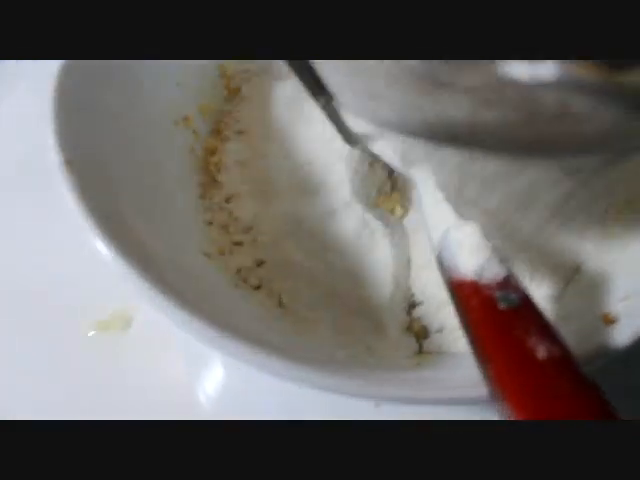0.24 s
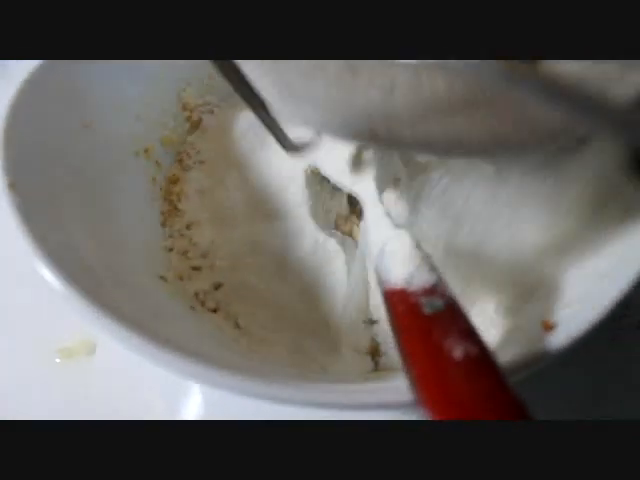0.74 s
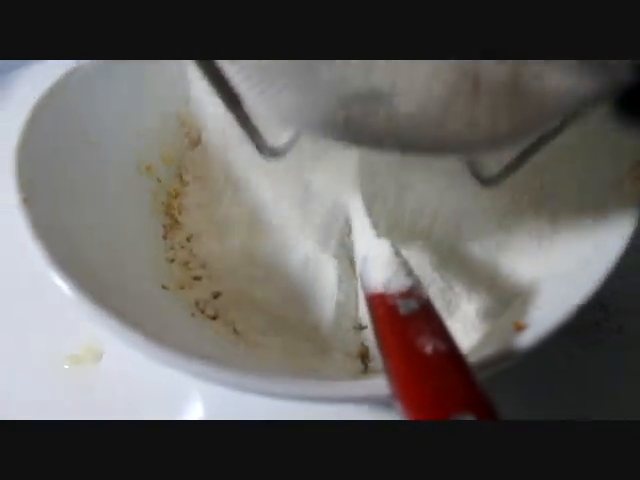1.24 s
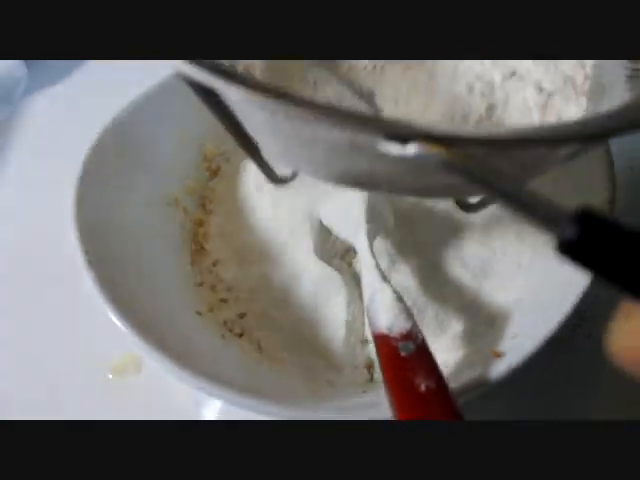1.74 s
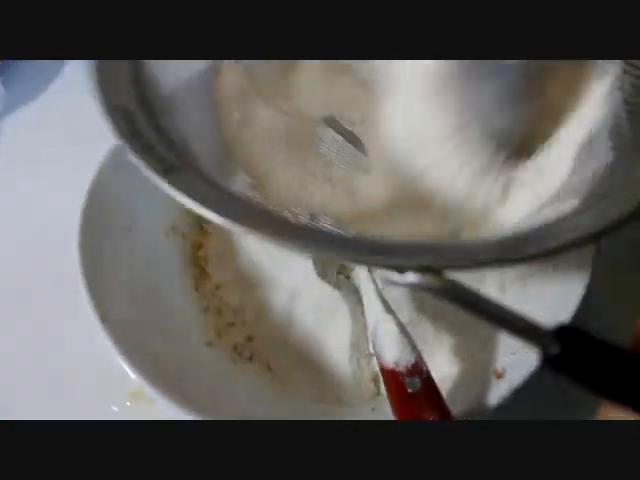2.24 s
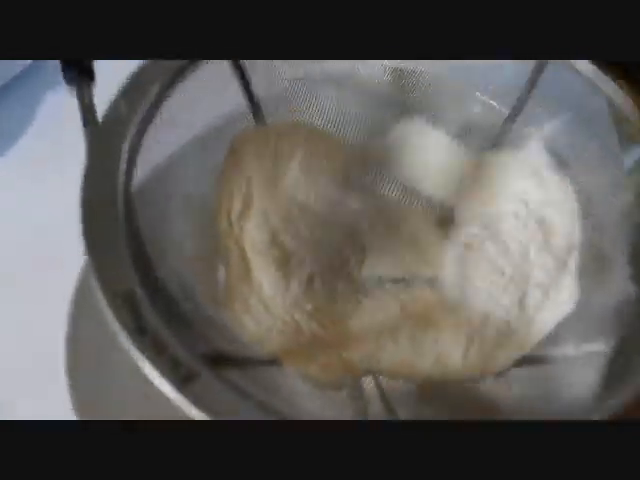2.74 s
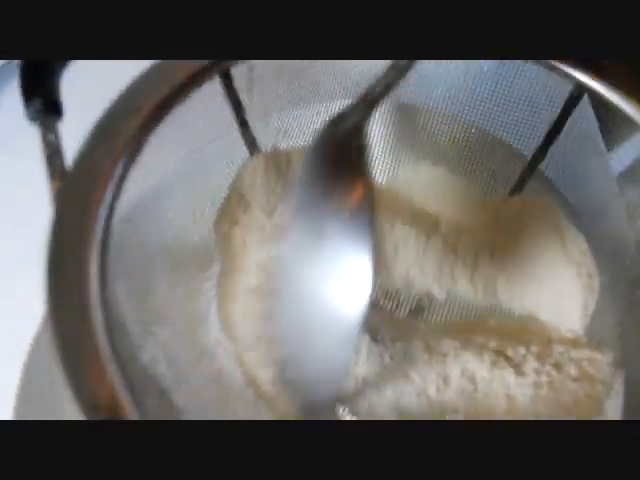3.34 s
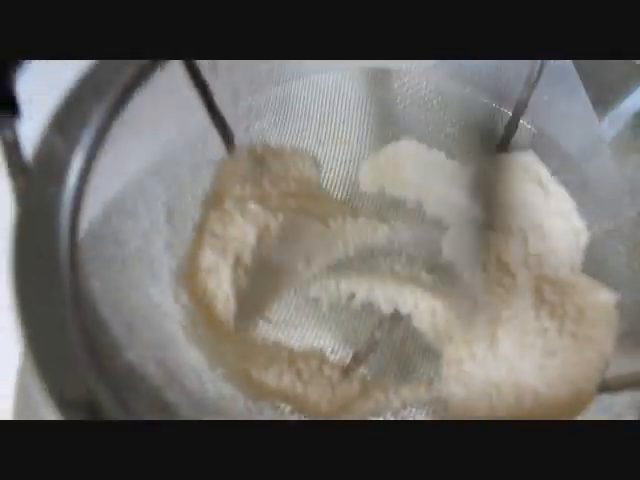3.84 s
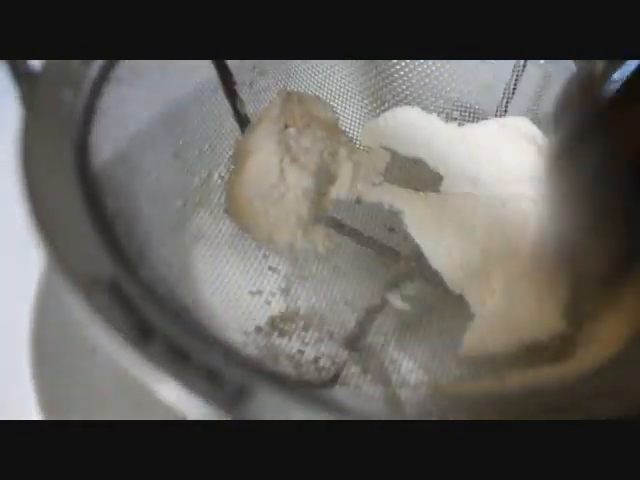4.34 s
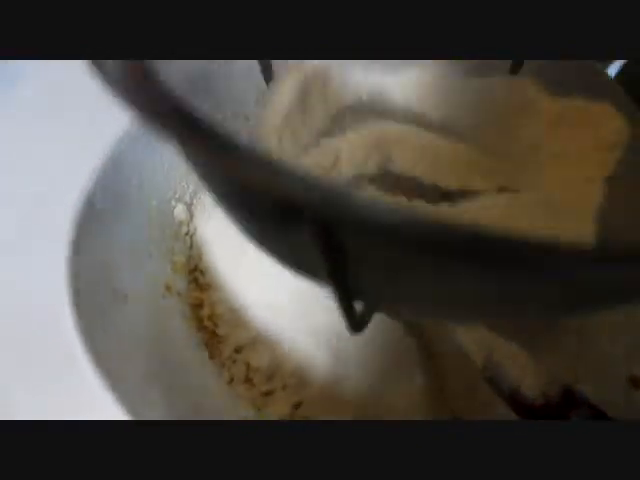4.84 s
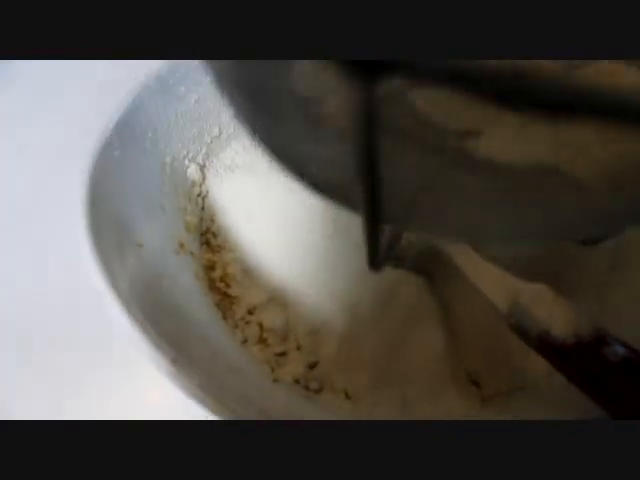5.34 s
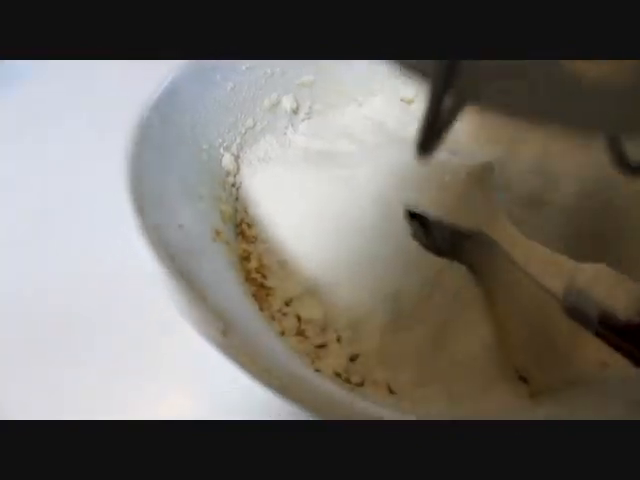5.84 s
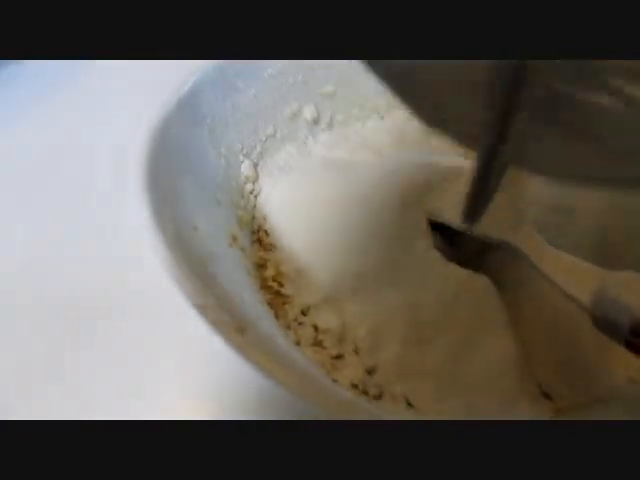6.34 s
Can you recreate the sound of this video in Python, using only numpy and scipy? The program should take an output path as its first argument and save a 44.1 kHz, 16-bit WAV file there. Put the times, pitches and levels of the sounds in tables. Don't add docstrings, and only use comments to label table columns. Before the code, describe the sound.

A fork scrapes flour through a wire sieve very close to a small microphone in a quiet kitchen. Quick raspy strokes come several per second, tines tripping over wires in dense ticks, with light taps, plucks and brief pauses. As the sieve empties, the sound turns from muffled and floury to barer and more ringing. A faint appliance hum and hiss continue underneath.

```python
import sys
import numpy as np
from scipy import signal
from scipy.fft import rfft, irfft
from scipy.io import wavfile
from scipy.ndimage import uniform_filter1d

SR = 44100
rng = np.random.default_rng(int(sys.argv[2]) if len(sys.argv) > 2 else 0)


def generate_wav(sig):
    pcm = np.round(np.clip(np.atleast_2d(sig).T, -1, 1) * 32767).astype(np.int16)
    wavfile.write(sys.argv[1], SR, pcm)


def convert_level_to_amplitude(level_db):
    exponent = np.asarray(level_db, float) / 20
    return 10 ** exponent


N = 291060
HZ = np.fft.rfftfreq(4096, 1 / SR)


def evened(x):
    return x / np.sqrt(np.mean(x ** 2) + 1e-20)


def smooth_noise(first, second):
    return evened(uniform_filter1d(uniform_filter1d(rng.standard_normal(N), size=first), size=second))


def read(points, hz):
    f, value = np.transpose(points)
    return np.interp(np.log(hz + 1), np.log(f + 1), value)


# (frequency [Hz], density [dB per Hz])
ROOM_HISS = [(15, -40), (25, -22), (100, -14), (216, -1), (330, -3.5), (557, -5), (729, -7), (1150, -11),
             (1820, -21), (2150, -12), (2660, -12.5), (3990, -12), (6310, -22), (7830, -14), (12100, -37),
             (14200, -34), (15800, -40)]
# (frequency [Hz], level [dB rms], drift [dB per s])
COMPRESSOR = [(60.6, -74, -0.5), (107, -71, 1), (120, -71, 0), (153, -62.5, 0.2), (192.5, -58, 0),
              (249, -59, 1.54), (422, -71, -2.5)]
HISS_DB = -49


def room_tone():
    hz, t = np.fft.rfftfreq(N, 1 / SR), np.arange(N) / SR
    spectrum = rfft(rng.standard_normal(N)) * convert_level_to_amplitude(read(ROOM_HISS, hz))
    hiss = evened(irfft(spectrum, N))
    lines = 0
    for f, db, drift_db in COMPRESSOR:
        waver = smooth_noise(6000, 4000)
        level = convert_level_to_amplitude(db + 3 + drift_db * (t - t.mean()) + 1.1 * waver)
        phase = 2 * np.pi * (f * t + rng.random()) + 0.3 * waver[::-1]
        lines = lines + level * np.sin(phase)
    return convert_level_to_amplitude(HISS_DB) * hiss + lines


# (peak [s], pressure [dB], rise [s], fall [s], tine ring [dB])
FORK_STROKES = [(0.025, -22.5, 0.031, 0.065, -28.0), (0.134, -29.5, 0.015, 0.021, -28.0),
                (0.174, -36.2, 0.026, 0.094, -23), (0.268, -23.5, 0.055, 0.027, -25),
                (0.348, -21.5, 0.063, 0.013, -23), (0.51, -35.0, 0.018, 0.31, -16),
                (0.595, -20.5, 0.033, 0.021, -27.0), (0.621, -23, 0.0093, 0.24, -35.0),
                (0.784, -44, 0.15, 0.0057, -30.0), (1.024, -30.5, 0.04, 0.012, -8),
                (1.075, -16.5, 0.049, 0.097, -27), (1.154, -33, 0.022, 0.13, -28.0),
                (1.263, -18, 0.043, 0.07, -31.0), (1.299, -25.5, 0.009, 0.078, -24),
                (1.387, -21.5, 0.048, 0.088, -23), (1.512, -17.5, 0.045, 0.074, -22.0),
                (1.651, -21, 0.079, 0.047, -21.0), (1.75, -29.5, 0.036, 0.005, -20.0),
                (1.998, -20, 0.086, 0.14, -23), (2.101, -27, 0.21, 0.023, -13),
                 (2.298, -32, 0.005, 0.075, -17), (2.364, -25, 0.079, 0.038, -21),
                 (2.525, -35, 0.016, 0.12, -14.0), (2.61, -29, 0.06, 0.04, -11),
                 (2.66, -18.5, .015, .03, -14), (2.688, -17, 0.075, 0.072, -14),
                 (2.724, -23.5, 0.075, 0.092, -27), (3.013, -31, 0.0061, .03, -25),
                 (3.04, -17.5, 0.025, 0.068, -30), (3.059, -14.5, .007, .008, -30),
                 (3.108, -24, 0.1, 0.022, -32.0), (3.295, -29.5, 0.004, 0.05, -34.0),
                 (3.372, -17.5, 0.066, 0.044, -20), (3.541, -31, 0.0081, 0.1, -14),
                 (3.646, -15.5, 0.044, 0.035, -29.0), (3.699, -19, 0.029, 0.081, -32.0),
                 (3.823, -20, 0.037, 0.072, -27), (3.964, -18.5, 0.064, 0.05, -20.0),
                 (4.072, -16.5, 0.046, 0.054, -19.0), (4.271, -29.5, 0.011, 0.03, -23),
                 (4.383, -15.9, 0.049, 0.017, -35.0), (4.438, -20, 0.048, 0.084, -35.0),
                (4.636, -22, 0.013, 0.087, -25.0), (4.709, -21, 0.056, 0.047, -22.0),
               (4.899, -26.5, 0.035, 0.083, -13.0), (4.967, -18, 0.062, 0.061, -28),
               (5.113, -17.5, 0.05, 0.053, -21), (5.237, -20.5, 0.074, 0.051, -23),
               (5.363, -18, 0.06, 0.045, -18), (5.471, -18, 0.061, 0.024, -23),
               (5.712, -20.5, 0.03, 0.027, -14.0), (5.785, -18.5, 0.078, 0.055, -24),
               (6.053, -32.5, 0.058, 0.006, -26.0), (6.114, -18.5, 0.074, 0.016, -10),
               (6.144, -26, 0.0049, 0.024, -5), (6.218, -28.9, 0.048, 0.0052, -20.0),
               (6.311, -19.5, 0.081, 0.065, -18), (6.45, -18.5, 0.031, 0.062, -14),
               (6.488, -25.5, 0.1, 0.0092, -23.0), (6.552, -20.5, 0.039, 0.065, -23.0)]
# (time [s], shank ring [dB])
SHANK_DRAGS = [
    (1.39, -22),
    (2.66, -19),
    (5.46, -27),
    (5.725, -9),
    (5.79, -24),
    (6.16, -3),
    (6.21, -12),
    (6.3, -13),
]
# (time [s], level change [dB])
FORK_LIFTS = [
    (2.7, -3),
    (4.508, -4.5),
    (0.78, -15),
    (2.125, -7),
    (2.81, 0.5),
]
RISE_POWER, FALL_POWER = 1.89, 1.99
SETTLE_DB, SETTLE_DB_PER_S = -12, 208
TINE_DB, SHANK_DB = 5, -40
RUB_S, LIFT_S = 0.059, 0.15


def hand():
    strokes = FORK_STROKES
    s, db, rise, fall, ring_db = np.transpose(strokes)[:, :, None]
    step_s = 0.001
    t = np.arange(0, N / SR + step_s, step_s)
    before = t < s
    away = np.where(before, (s - t) / rise, (t - s) / fall)
    drop_db = 20 * np.minimum(away, 6) ** np.where(before, RISE_POWER, FALL_POWER)
    each = convert_level_to_amplitude(2 * (db - drop_db)) + 1e-20
    power = each.sum(axis=0)
    tine_db = TINE_DB + 10 * np.log10((each * convert_level_to_amplitude(2 * ring_db)).sum(axis=0) / power)
    keep = convert_level_to_amplitude(-2 * SETTLE_DB_PER_S * step_s)
    settling = convert_level_to_amplitude(2 * SETTLE_DB) * signal.lfilter([1 - keep], [1, -keep], power)
    lift_db = sum(drop * ((t > at) & (t < at + LIFT_S)) for at, drop in FORK_LIFTS)
    lifted = convert_level_to_amplitude(2 * lift_db)
    power, settling = (power + settling) * lifted, settling * lifted
    rubs = sum(convert_level_to_amplitude(rub_db - 20 * ((t - at) / RUB_S) ** 2) for at, rub_db in SHANK_DRAGS)
    shank_db = 20 * np.log10(convert_level_to_amplitude(SHANK_DB) + rubs)
    curves = 10 * np.log10(power), tine_db, shank_db, settling / power
    return (np.interp(np.arange(N) / SR, t, curve) for curve in curves)


# (time [s], length [s], start [Hz], end [Hz], level [dB])
WIRE_ZIPS = [(0.0, 0.046, 708, 744, -39), (0.12, 0.022, 422, 335, -39), (0.589, 0.093, 656, 801, -40),
             (0.659, 0.07, 564, 578, -39.5), (0.706, 0.048, 498, 189, -41.5), (1.094, 0.077, 660, 240, -43),
             (1.259, 0.065, 573, 325, -41.5), (1.375, 0.045, 492, 554, -42),
             (1.407, 0.044, 547, 228, -44.5), (1.499, 0.09, 566, 406, -49), (1.625, 0.055, 521, 476, -50),
             (1.928, 0.063, 322, 482, -44.5), (1.963, 0.046, 950, 954, -51), (2.03, 0.038, 1120, 1010, -37),
             (2.034, 0.044, 690, 705, -40), (2.315, 0.082, 406, 662, -54), (3.027, 0.05, 730, 620, -51),
             (3.338, 0.067, 718, 610, -42), (3.772, 0.058, 228, 617, -52), (3.82, .05, 620, 424, -48),
             (3.917, .055, 262, 603, -55), (3.96, .045, 614, 433, -53), (4.039, 0.051, 500, 690, -53),
             (4.063, 0.034, 705, 430, -46), (4.646, 0.12, 549, 582, -49), (4.959, 0.048, 755, 620, -49),
             (5.089, 0.048, 707, 608, -47), (5.204, 0.031, 440, 423, -45.5), (5.34, 0.047, 717, 423, -45),
             (5.443, 0.048, 626, 723, -50), (5.742, 0.13, 516, 853, -52), (6.067, .06, 467, 705, -47.5),
             (6.252, 0.038, 390, 475, -50), (6.306, 0.04, 880, 866, -41.5), (6.447, .05, 665, 445, -48)]
ZIP_OVERTONES = (0.5, 1, 0.5, -13, -21, -19)
ARCH = 0.0608


def zips():
    tone, beat = np.zeros(N), np.zeros(N)
    wobble = evened(uniform_filter1d(rng.standard_normal(N), size=500))
    for s, length, start_hz, end_hz, db in WIRE_ZIPS:
        at = slice(round(s * SR), round((s + length) * SR))
        u = np.linspace(0, 1, len(tone[at]))
        speed = (start_hz + (end_hz - start_hz) * u) * (1 + ARCH * np.sin(np.pi * u))
        turn = 2 * np.pi * np.cumsum(speed * (1 + 0.025 * wobble[at])) / SR
        fade = signal.windows.tukey(len(u), 0.6)
        wave = sum(convert_level_to_amplitude(over_db) * np.cos((k + 1) * turn) for k, over_db in enumerate(ZIP_OVERTONES))
        tone[at] += fade * convert_level_to_amplitude(db + 5.0) * wave
        beat[at] += fade * np.cos(turn)
    return tone, beat


def causal(db):
    log_gain = np.log(convert_level_to_amplitude(np.maximum(db, -100)))
    circle = np.concatenate([log_gain, log_gain[-2:0:-1]])
    return np.fft.ifft(np.exp(np.conj(signal.hilbert(circle)))).real


def mode(hz, width):
    t = np.arange(4096) / SR
    decay = np.exp(-np.pi * width * t)
    ringing = decay * np.sin(2 * np.pi * hz * t)
    return ringing / np.linalg.norm(ringing)


# (frequency [Hz], density [dB per Hz])
SIEVE_COLOUR = [(180, -26), (300, -23.5), (688, -18), (825, -17), (942, -15), (1190, -12), (1500, -4.5),
                (1830, -5.5), (2050, 0), (2820, -2.5), (4330, -2.5), (6890, -4), (8550, -1), (13600, -12),
                (15800, -12)]
# (frequency [Hz], width [Hz], level [dB])
RIM_MODES = [(682, 80, 0), (1000, 130, 4), (1480, 130, -7), (2110, 53, -28.5), (2994, 130, -0.5),
             (4150, 370, -3), (8950, 330, -25)]
# (low edge [Hz], high edge [Hz])
BODY_BANDS = [(500, 2200), (2500, 6500), (7000, 12500)]
BOWL_HZ, BOWL_SHARE = 4404, 0.18


def bodies():
    peaks = sum(convert_level_to_amplitude(2 * db) / (1 + ((HZ - f) / (w / 2)) ** 2) for f, w, db in RIM_MODES)
    colour_db = read(SIEVE_COLOUR, HZ) + 10 * np.log10(1 + 1.53 * peaks)
    colour_db += 20 * np.log10(abs(1 + BOWL_SHARE * np.exp(2j * np.pi * HZ / BOWL_HZ)))
    low = 1 / (1 + (HZ / 2350) ** 6)
    high = 1 / (1 + (6700 / (HZ + 1)) ** 8)
    out = []
    for share, (lo, hi) in zip([low, 1 - low - high, high], BODY_BANDS):
        db = colour_db + 10 * np.log10(np.clip(share, 1e-9, 1))
        in_band = (HZ > lo) & (HZ < hi)
        energy = 2 * np.sum(convert_level_to_amplitude(2 * db)[in_band]) / 4096
        out.append(causal(db) / np.sqrt(energy))
    return out


def hail(per_s, spread_db):
    hit = rng.random(N) < per_s / SR
    size, sign = rng.exponential(1, N), rng.standard_normal(N)
    return evened(hit * sign * convert_level_to_amplitude(spread_db * np.minimum(size, 4)))


def ring(drive, paths):
    return sum(signal.oaconvolve(d, p)[:N] for d, p in zip(drive, paths))


def patchy(x, patchy_db):
    z = signal.stft(x, nperseg=512, noverlap=384)[2]
    field = rng.standard_normal(z.shape[::-1]).T
    field = evened(uniform_filter1d(uniform_filter1d(field, size=4, axis=0), size=4, axis=1))
    gain = evened(convert_level_to_amplitude(patchy_db * field))
    return signal.istft(z * gain, nperseg=512, noverlap=384)[1][:N]


# (time [s], flour load [dB], bare wire [dB])
SIEVE_EMPTIES = [(0, -4.5, -4), (.75, -4, -4), (1.1, -7, -0.5), (1.75, -6.5, -3.5), (2.1, -4, -6.5),
                 (2.6, -8.5, -7), (3.3, -6.5, -8.5), (3.8, -10.5, -6.5), (4.5, -8, -5.5), (4.95, -11, -0.5),
                 (5.7, -13.5, -0.5), (6.6, -12.5, 1)]
PRESSURE_LAG = (0.29, 0.0041, 0.08, .2)
# (time [s], level [dB])
FINE_FIZZ = [(0, -4.5), (.7, -4), (1.3, -3.5), (2.0, 0.5), (3.0, 5), (4.5, 4.5), (6.6, -1)]
FIZZ_HZ = 10000
HUSH_DB, DULL_DB = -3, -2.5
TINE_HZ, TINE_WIDTH_HZ = 13640, 120
SHANK_HZ, SHANK_WIDTH_HZ = 15570, 70


def scrape():
    db, tine_db, shank_db, settled = hand()
    t = np.arange(N) / SR
    s, load_db, bare_db = np.transpose(SIEVE_EMPTIES)
    load_db = np.interp(t, s, load_db) + HUSH_DB * settled
    bare_db = np.interp(t, s, bare_db) + DULL_DB * settled
    swing_db = np.maximum(db, -60) + 28.5
    levels_db = load_db, bare_db, tine_db, shank_db
    load, bare, tine, shank = (convert_level_to_amplitude(level - lag * swing_db) for level, lag in zip(levels_db, PRESSURE_LAG))
    tone, beat = zips()
    chatter = smooth_noise(160, 120)
    pressure = convert_level_to_amplitude(db + 1.2 * chatter) * (1 + 0.072 * beat)
    shared = hail(12000, 4.8)
    mesh_ticks = [evened(shared + 1.08 * hail(15000, 1.74)) for _ in range(3)]
    fork_ticks = [hail(2500, 4.4) for _ in range(2)]
    drive = pressure * np.array(mesh_ticks + fork_ticks) * [load, np.ones(N), bare, tine, shank]
    mesh = patchy(ring(drive[:3], bodies()), patchy_db=2.5)
    fork = ring(drive[3:], [mode(TINE_HZ, TINE_WIDTH_HZ), mode(SHANK_HZ, SHANK_WIDTH_HZ)])
    treble = signal.firwin(101, FIZZ_HZ, pass_zero=False, fs=SR)
    fizz = signal.oaconvolve(mesh, treble, "same")
    fizz_gain = convert_level_to_amplitude(np.interp(t, *np.transpose(FINE_FIZZ))) - 1
    return mesh + fizz_gain * fizz + fork + tone


# (frequency [Hz], t60 [s])
KITCHEN_DECAY = [(300, 0.5), (1000, 0.28), (3000, 0.14), (8000, 0.097), (15000, 0.035)]


def kitchen(x):
    echoes = np.zeros(SR // 2)
    at = np.arange(200, SR // 2 - 20, 20)
    echoes[at + rng.integers(0, 20, len(at))] = rng.choice([-1., 1.], len(at))
    hz, t, z = signal.stft(echoes, SR, nperseg=256)
    decay = convert_level_to_amplitude(-60 * t / read(KITCHEN_DECAY, hz)[:, None])
    tail = signal.istft(z * decay, SR, nperseg=256)[1]
    return signal.fftconvolve(x, tail / np.linalg.norm(tail))[:N]


# (time [s], peak [dB], pitch [Hz])
WIRE_PLUCKS = [(0.1221, -18, 1530), (0.3384, -1.5, 5710), (0.5856, -4, 5740), (0.622, -1.5, 2470),
               (1.0432, 1, 3110), (1.0505, -14, 4500), (1.061, -1, 3230), (1.072, 1, 5200),
               (1.075, -1, 4440), (1.085, -15, 4500), (1.098, -2, 4440), (1.112, -1, 5340),
               (1.238, -13, 4300), (1.498, -10, 3800), (2.2762, -7, 3860), (2.6189, -12, 3040),
               (2.6284, -11, 3550), (2.6364, -9, 4750), (2.6416, -1, 3840), (2.6504, 0, 3870),
               (2.6554, -2, 4230), (2.6634, -4, 4040), (2.6917, -5, 3690), (2.7084, -7, 2020),
               (2.9287, -17.5, 3900), (3.016, -19, 3550), (3.026, -8, 3800), (3.2721, -10.5, 1450),
               (3.5414, -9, 4830), (3.6093, 2, 3070), (3.622, 0, 3090), (3.6361, -1, 5340),
               (3.6424, -4, 5500), (3.6875, -10, 4340), (3.688, -7, 4290), (3.814, -8, 4140),
               (4.0554, -3, 4230), (4.2697, -11.5, 2880), (4.3425, -9, 4100), (4.3535, -4, 4380),
               (4.6137, -6, 3920), (4.8479, -13, 4100), (4.9227, -10, 4470), (4.9422, -12, 4310),
               (5.0868, -15, 4050), (5.098, -7, 4000), (5.3208, -8, 5730), (5.337, -6, 4160),
               (5.436, -10, 8490), (5.452, 2.5, 4200), (5.653, -13.5, 2940), (5.6897, 4, 3890),
               (5.7626, 0, 4920), (5.992, -9, 4360), (6.0745, -10, 4260), (6.142, -11, 3850),
               (6.2754, -8, 4230), (6.4215, -8, 3730), (6.4385, 0, 8930), (6.5357, -10, 4400)]
PLUCK_DB, PLUCK_T60_S, PLUCK_RISE_S, SNAP_DB = -10, 0.022, 0.00072, -1


def plucks():
    t = np.arange(1500) / SR
    out, snap = np.zeros(N + len(t)), np.zeros(N)
    rise = np.minimum(t / PLUCK_RISE_S, 1)
    for s, db, hz in WIRE_PLUCKS:
        at = round(s * SR)
        level = convert_level_to_amplitude(db + PLUCK_DB - 60 * t / PLUCK_T60_S)
        out[at:at + len(t)] += level * np.sin(2 * np.pi * hz * t) * rise
        snap[at + round(PLUCK_RISE_S * SR)] = convert_level_to_amplitude(db + SNAP_DB)
    return out[:N] + ring([snap * convert_level_to_amplitude(-11.5), snap, snap * convert_level_to_amplitude(-1.5)], bodies())


# (time [s], peak [dB], knock [dB], brightness [dB], ring [dB])
FORK_LANDINGS = [(0.123, -18.5, -13, -2, -28), (0.494, -23, -20, -9, -19), (0.9477, -20, -20, -1, -20),
                 (0.9827, -30, -25, 1, -13), (1.7404, -11.5, -31, -3.5, -28),
                 (1.8422, -31.5, -23, -16, -24), (2.2769, -11.5, -25, -9, -21),
                 (2.512, -23.5, -64, -10, -32), (2.9289, -19, -19, -5.5, -14),
                 (3.2714, -12.5, -20.5, -10.5, -28), (3.536, -29.5, -25, 3, 5),
                 (4.2427, -18.5, -15, -8, -21), (4.614, -11.5, -26, -9.5, -22),
                 (4.849, -17.5, -38, -2, -19), (4.8766, -31, -28, -10, -13), (5.531, -22.5, -31, -0.5, -17),
                 (5.653, -21, -27, 2, -13), (5.9909, -16.5, -17.5, 3.5, -31)]
# (time [s], peak [dB], brightness [dB], ring [dB])
TINE_SNAGS = [(0.585, -10, -11, -27), (0.616, -8.5, -22, -36), (1.043, -15, -15, -23),
              (1.0605, -8, 0.5, -25), (1.600, -14.5, 2, -25), (2.3433, -17, -11, -26),
              (3.057, -10, -13, -28), (2.6425, -8, 1, -18), (3.6092, -9.5, -10.5, -21),
              (3.622, -12, -16, -25), (4.2697, -25, -15, -20), (4.343, -17, -6, -21),
              (5.691, -10, -12, -12), (6.1437, -19, -7, -3), (6.4217, -16, -3, -13),
              (6.5121, -18, 4.5, -23)]
LANDING_BODY_DB, SNAG_BODY_DB, SNAG_KNOCK_DB = -12.5, -16, -33
HOLD_S = 0.0027


def taps():
    t = np.arange(900) / SR
    rows = [(s, db, knock_db, LANDING_BODY_DB, *rest) for s, db, knock_db, *rest in FORK_LANDINGS]
    rows += [(s, db, SNAG_KNOCK_DB, SNAG_BODY_DB, *rest) for s, db, *rest in TINE_SNAGS]
    shape = (len(rows), len(t))
    rattle = rng.standard_normal(shape) * convert_level_to_amplitude(0.36 * rng.exponential(1, shape))
    bounces = convert_level_to_amplitude(-60 * np.maximum(t - HOLD_S, 0) / 0.018) + 0.17 * convert_level_to_amplitude(-60 * t / 0.099)
    envelope = bounces * np.minimum(t / 0.00039, 1)
    drive = np.zeros((6, N + len(t)))
    for (s, db, knock_db, body_db, bright_db, ring_db), grit in zip(rows, rattle):
        blow = evened(grit) * convert_level_to_amplitude(db - 9.0) * envelope
        share_db = np.array([body_db + 5.5, 0, bright_db, ring_db + 8.0, ring_db - 14.0])
        at = round(s * SR)
        drive[:5, at:at + len(t)] += blow * convert_level_to_amplitude(share_db)[:, None]
        drive[5, at] += convert_level_to_amplitude(db + knock_db + 22.5)
    fork = [mode(TINE_HZ, width=240), mode(SHANK_HZ, SHANK_WIDTH_HZ)]
    drum = mode(400, width=300)
    return ring(drive[:, :N], bodies() + fork + [drum])


# (time [s], length [s], pitch [Hz], level [dB rms])
SINGING_PATCHES = [(0.314, 0.044, 1590, -27), (0.322, 0.051, 2850, -29), (0.577, 0.08, 3110, -31),
                   (0.676, 0.049, 1790, -30), (1.061, 0.04, 5167, -25), (1.244, 0.044, 4360, -25),
                   (1.267, 0.038, 1981, -33), (1.377, 0.063, 4320, -32), (1.485, 0.064, 4370, -29),
                   (1.5, 0.066, 2540, -30), (1.618, 0.048, 2255, -27.5), (1.628, 0.041, 4460, -32),
                   (1.957, 0.08, 970, -33.5), (1.958, 0.036, 3020, -30), (1.991, 0.062, 4020, -35),
                   (2, 0.074, 4478, -31), (2.059, 0.044, 1464, -33), (2.072, 0.05, 3080, -30),
                   (2.645, 0.048, 5650, -22.5), (2.664, 0.064, 1470, -31), (3.015, 0.038, 3840, -26),
                   (3.052, 0.031, 1981, -26), (3.346, 0.058, 2040, -32), (3.352, 0.042, 5400, -24.5),
                   (3.81, 0.06, 4306, -28), (3.935, 0.039, 4306, -23), (4.045, 0.034, 4480, -21),
                   (4.058, 0.054, 3160, -30), (4.064, 0.031, 2030, -33), (4.348, 0.045, 4306, -27),
                   (4.406, 0.073, 3789, -32), (4.658, 0.067, 3060, -29), (4.688, 0.033, 5684, -24.5),
                   (4.961, 0.033, 4330, -26), (4.957, 0.036, 5857, -26), (5.095, 0.052, 4120, -27),
                   (5.098, 0.049, 2110, -30.5), (5.352, 0.049, 3020, -32), (5.684, 0.046, 3970, -27),
                   (5.743, 0.044, 4200, -35), (5.753, 0.059, 4823, -27), (6.28, 0.045, 4500, -24.5),
                   (6.275, 0.039, 9200, -22.5), (6.285, 0.099, 3880, -30), (6.433, 0.052, 8527, -25)]
SING_WIDTH_HZ, SING_DB = 85, 1.5


def singing():
    out, grit = np.zeros(N), hail(6000, 2.2)
    for s, length, hz, db in SINGING_PATCHES:
        at = slice(round(s * SR), round((s + length) * SR))
        rung = signal.oaconvolve(grit[at], mode(hz, width=SING_WIDTH_HZ))[:len(grit[at])]
        out[at] += convert_level_to_amplitude(db + SING_DB) * evened(rung) * np.hanning(len(rung))
    return out


# (time [s], pitch [Hz], level [dB], t60 [s])
FORK_PINGS = [(1.795, 9400, -42, .08), (1.808, 14300, -58, .06), (1.80, 2110, -47, .35),
              (1.835, 2110, -48, 0.18), (1.851, 14300, -54, .07), (1.853, 4748, -50, .03),
              (2.262, 2110, -54, .2), (2.458, 2110, -49, .6), (2.80, 2115, -49, .4),
              (3.452, 12750, -52, .15), (3.452, 11300, -54, .1), (4.154, 14350, -56.5, .1),
              (4.196, 14350, -45, .06), (4.196, 11300, -49, .06), (4.196, 8760, -43, .06),
              (5.505, 14300, -52, .1), (5.52, 12750, -54, .2), (5.56, 2110, -52, .6),
              (5.69, 15570, -15, .05), (6.146, 15560, -9, 0.049), (2.643, 15570, -18, .07)]


def pings():
    out, t = np.zeros(N), np.arange(8000) / SR
    rise = np.minimum(t / 0.0018, 1)
    for s, hz, db, t60 in FORK_PINGS:
        at = round(s * SR)
        out[at:at + len(t)] += convert_level_to_amplitude(db - 60 * t / t60) * np.sin(2 * np.pi * hz * t) * rise
    return out


def scene():
    no_bass = signal.butter(3, 150, "highpass", fs=SR, output="sos")
    sieve = signal.sosfilt(no_bass, scrape() + plucks() + taps() + singing() + pings())
    return (sieve + convert_level_to_amplitude(-18.0) * kitchen(sieve) + room_tone())[None]


def top_cut(x):
    return signal.sosfilt(signal.butter(12, 16950, fs=SR, output="sos"), x)


def record(dry):
    bassless = signal.sosfilt(signal.butter(2, 35, "highpass", fs=SR, output="sos"), dry)
    soft = 1.3 * np.tanh(bassless / 1.3)
    band_limit = signal.firwin(1023, 15790, window=("kaiser", 9), fs=SR)
    mix = signal.oaconvolve(soft, band_limit[None], "same")
    return top_cut(mix)


dry = scene()
out = record(dry)
generate_wav(out)
```